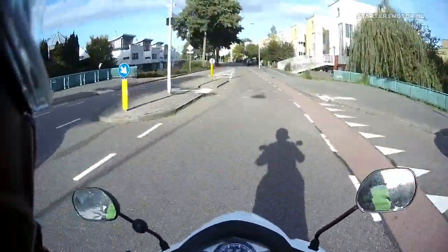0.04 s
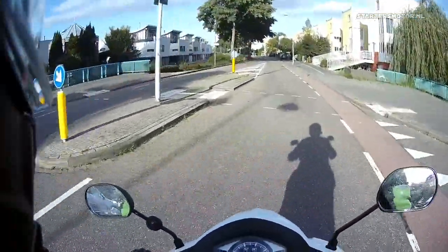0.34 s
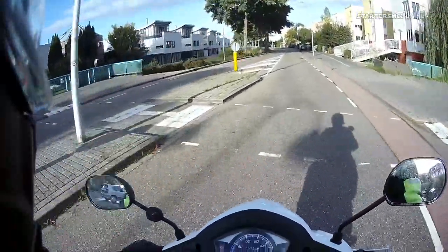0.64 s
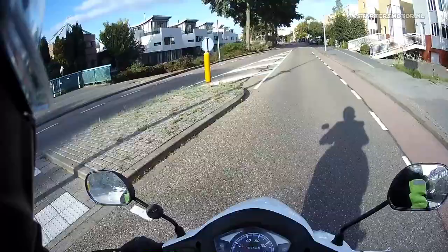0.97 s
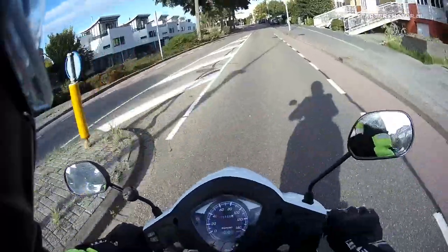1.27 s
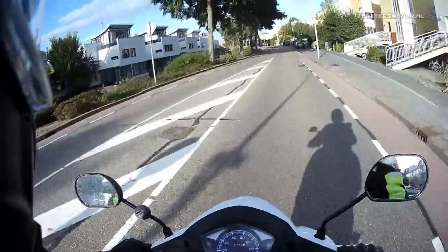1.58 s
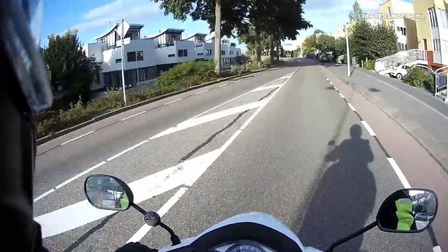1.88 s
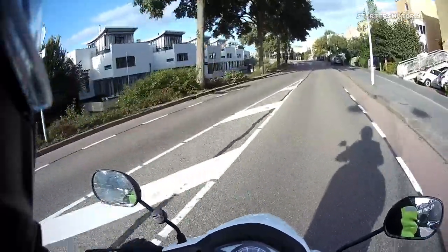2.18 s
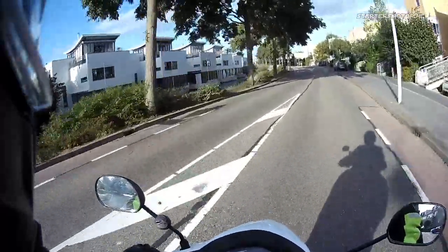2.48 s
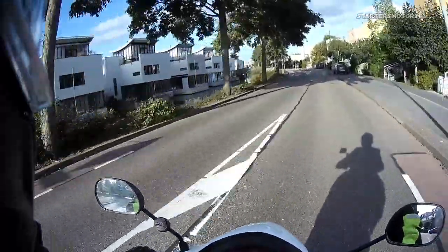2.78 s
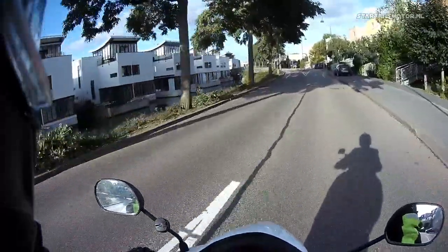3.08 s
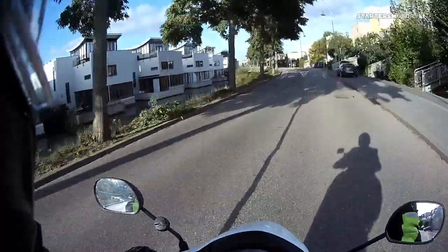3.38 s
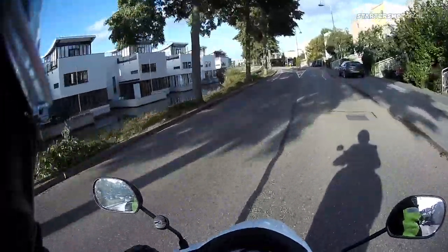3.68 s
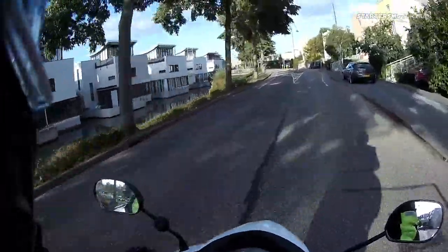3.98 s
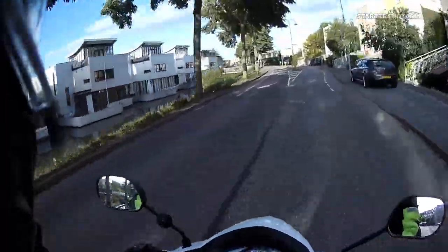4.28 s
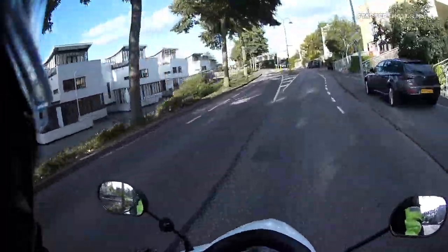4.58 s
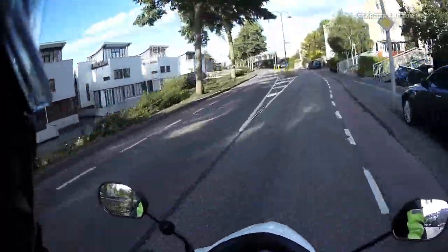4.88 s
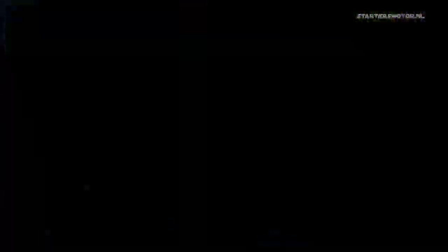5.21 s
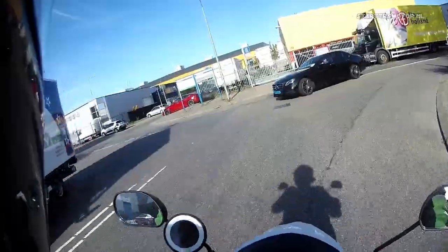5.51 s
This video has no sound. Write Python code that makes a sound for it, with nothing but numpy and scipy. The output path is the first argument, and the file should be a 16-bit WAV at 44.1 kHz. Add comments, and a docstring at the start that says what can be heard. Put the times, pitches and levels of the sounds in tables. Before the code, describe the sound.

A scooter rides through town, heard from the rider's seat. Its single-cylinder engine clatters at nearly steady revs under a horn-like boom that beats against the rising hum of the drive. Wind and tyres rush, gusts buffet the microphone, and a road seam thumps both wheels and clacks the body panels. Near the end the engine fades away and a quieter, windy ride fades in.

```python
"""A horn-like boom over a clattering single-cylinder four-stroke: a scooter in town, microphone at the
rider's seat, revs nearly steady. The engine's seventh and eighth orders boom in a duct resonance, and
the rising hum of the final drive beats against them. Wind and tyres rush, gusts buffet the microphone,
and a road seam thumps both wheels and clacks the body panels; ticks and airy hisses come and go.
Near five seconds the ride fades out and a quieter, windy ride fades in."""
import sys
import numpy as np
from scipy import signal
from scipy.fft import rfft, irfft
from scipy.io import wavfile

SR = 44100
rng = np.random.default_rng(int(sys.argv[2]) if len(sys.argv) > 2 else 0)


def materialize(psi):
    """Save the field psi as 16-bit PCM at rate SR to the path in sys.argv[1].

    A 1-D psi becomes a single channel; in a 2-D psi each row is a channel.
    """
    bounded = np.clip(np.atleast_2d(psi).T, -1, 1)
    quanta = np.round(bounded * 32767).astype(np.int16)
    wavfile.write(sys.argv[1], SR, quanta)


N = 249165
TIME = np.arange(N) / SR

# Engine speed: time_s, firing_hz
FIRING_RATE = [(0.0, 50.08), (0.33, 51.52), (1.22, 51.83), (2.4, 50.54), (2.6, 50.54), (3.34, 48.78),
               (3.85, 50.47), (4.25, 50.93), (4.72, 50.03), (5.15, 47.36)]
# Throttle: time_s, load (0 cruising, 1 pulling)
THROTTLE = [(.2, 0.63), (.3, 0.92), (.62, 1.18), (1.0, 0.93), (1.35, 0.96), (1.85, 0.64), (2.0, .4),
            (2.5, .15), (3.3, 0), (4.1, 0.3), (4.5, 0.22), (4.61, 0.96), (4.67, 0)]
# Engine tones: order (multiple of the firing rate), pulling_db, cruising_db
ENGINE_ORDERS = [(1, -28.5, -28.5), (2, -33, -35), (3, -31.5, -31), (4, -38.5, -34.5), (5, -26, -27.5),
                 (6, -33, -37), (9, -37.5, -39), (10, -34, -40.5), (11, -35, -43), (12, -36.5, -32),
                 (13, -46, -44), (14, -35, -36.5), (15, -43, -43.5), (16, -40, -40.5), (17, -40.5, -50),
                 (19, -35, -43), (20, -39, -44.5), (22, -48.5, -43.5), (23, -46.5, -52), (24, -42, -49),
                 (26, -42.5, -46), (27, -42.5, -41), (28, -48, -44.5), (31, -45, -50.5), (32, -48, -48),
                 (33, -44.5, -51), (34, -49.5, -50.5), (36, -49.5, -51), (45, -61.5, -70), (49, -60.5, -68)]
# Knocks within one engine cycle: cycle_share, strength_db
CYCLE_KNOCKS = [(.955, -1.5), (.11, -11.5), (.2, -9), (.38, -6.5), (.57, -12.5), (.74, -13.5)]
# What each knock rings in the casing: pitch_hz, relative_db, t60_s
CASING_MODES = [(1000, -8.5, 0.035), (1080, -11.5, .02), (1216, -3, 0.022), (1365, 2, 0.045),
                (1500, -3, .015), (1710, -2.5, 0.046), (1838, -3, 0.038), (2540, -18, .025),
                (3400, -18, .008)]
# Gas rush of the firings: frequency_hz, density_db
GAS_SPECTRUM = [(60, -80.5), (200, -57.5), (420, -56.5), (700, -56.5), (1000, -64), (1650, -67.5),
                (2050, -84), (2800, -86.5), (3600, -91), (5000, -99), (12000, -125)]
# Hiss of valve gear and belt: frequency_hz, density_db
BELT_SPECTRUM = [(1500, -93), (2200, -79.5), (2850, -89), (3500, -84), (4300, -95.5), (5300, -96),
                 (5700, -87), (6200, -98), (8000, -105), (8600, -97.5), (9600, -108), (12500, -118)]
# Hum of the final drive, rising with road speed: time_s, pitch_hz
DRIVE_PITCH = [(0, 285), (1.9, 343), (2.6, 358), (3.5, 373), (4.3, 389), (4.7, 394), (5.2, 393)]
# Wind on the microphone and tyre roar from below: frequency_hz, density_db
WIND_SPECTRUM = [(8, -48.5), (22, -42), (45, -53), (100, -56), (250, -57.5), (600, -62), (1000, -68.5),
                 (2000, -81), (4000, -100), (8000, -106), (13000, -116)]
# Gusts on the microphone: middle_s, length_s, gain_db
WIND_GUSTS = [(2.05, 0.27, -1), (3.47, .28, 4), (4.19, .36, 8.5)]
# Small sharp ticks: start_s, level_db, pitch_hz, t60_s
SHARP_TICKS = [(.207, -42, 8000, .0008), (1.174, -24, 8040, .0008), (1.428, -41, 8000, .0008),
               (2.28, -28, 7960, .0008), (2.499, -27, 8000, .0008), (3.447, -27, 8000, .0008),
               (4.489, -37, 8000, .0008), (4.808, -33, 7960, .0008), (5.397, -38, 6500, .002),
               (5.568, -35, 5700, 0.0037), (5.579, -38, 6500, .001)]
# Bursts of airy hiss: middle_s, length_s, gain_db
HISS_BURSTS = [(.86, .3, 0.5), (1.1, .18, -3), (1.91, 0.18, 1), (2.028, 0.13, -2), (2.19, .22, -2.5),
               (5.393, 0.042, -2), (5.51, .09, -3), (5.63, 0.055, -1)]
# Colour of that hiss: frequency_hz, density_db
HISS_SPECTRUM = [(1500, -105), (3500, -87), (6500, -93.5), (9000, -95), (11000, -104), (14000, -111)]
# Wheels over road seams: start_s, gain_db, rattle_t60_s
SEAM_HITS = [(1.957, -5, 0.094), (2.017, -.5, 0.058), (2.032, -7.5, 0.25), (2.073, -3, .1),
             (5.548, -14.5, .04)]
# What a seam rings in the frame: pitch_hz, level_db, t60_s
FRAME_MODES = [(201, -11, 0.041), (587, -16, 0.053), (940, -16.5, 0.029)]
# Chassis rattle: frequency_hz, density_db
CHASSIS_SPECTRUM = [(30, -51), (90, -52), (140, -40), (230, -41), (450, -47), (590, -41), (720, -47),
                    (1100, -55), (2000, -71.5), (5000, -93), (12000, -120)]
# Clacks of loose body panels: start_s, gain_db, t60_s
PANEL_HITS = [(2.014, 1.5, .035), (2.039, -8, .02), (2.071, 1.5, 0.033), (5.622, -17, .04)]
# Colour of a clack: frequency_hz, density_db
PANEL_SPECTRUM = [(400, -72), (800, -54), (1050, -50), (2000, -62), (2600, -67), (3500, -75), (5200, -77.5),
                  (6800, -95), (12000, -112)]
# Windy rush of the quieter ride: frequency_hz, density_db
QUIET_RIDE_SPECTRUM = [(8, -52), (30, -55.5), (90, -60.5), (170, -60.5), (290, -64.5), (400, -63.5),
                       (600, -67.5), (900, -76.5), (1600, -82), (3000, -93), (4500, -98.5), (6000, -99),
                       (12000, -114)]

BOOM_HZ, BOOM_WIDTH_HZ, BOOM_DB = 362.8, 15.2, -14  # narrow duct peak that lifts the seventh order
EIGHTH_DB, EIGHTH_NULL_LOAD = -21, 0.39  # the eighth order cancels at part load
DUCT_HZ, DUCT_WIDTH_HZ, DUCT_NOISE_DB = 367.4, 90, -28.5  # broader band rung by turbulence
HOUSING_HZ, HOUSING_WIDTH_HZ, DRIVE_DB = 371.5, 68, -26.5  # resonance of the drive housing
CUT_S = 5.2  # one ride gives way to the other


def gain_of(db):
    """Decibels to amplitude."""
    return 10 ** (np.asarray(db) / 20)


def unit_rms(x):
    """Scales to rms 1."""
    return x / np.sqrt(np.mean(x ** 2) + 1e-20)


def curve(rows):
    """A (time_s, value) table interpolated at every sample."""
    return np.interp(TIME, *np.transpose(rows))


def wander(rate_hz):
    """Smooth random drift of rms 1, mostly slower than rate_hz."""
    hz = np.fft.rfftfreq(N, 1 / SR)
    return unit_rms(irfft(rfft(rng.standard_normal(N)) * np.exp(-(hz / rate_hz) ** 2) * (hz > 0), N))


def rush(spectrum, envelope, size=8192):
    """Noise under an envelope, then through a causal filter shaped to a density in dB per hertz."""
    hz, db = np.transpose(spectrum)
    bin_hz = abs(np.fft.fftfreq(size, 1 / SR)) + 1
    log_gain = np.log(gain_of(np.interp(np.log(bin_hz), np.log(hz), db)))
    taps = np.fft.ifft(np.exp(np.conj(signal.hilbert(log_gain)))).real[:size // 2]  # minimum phase
    return signal.oaconvolve(rng.standard_normal(N) * envelope, taps)[:N] * np.sqrt(SR / 2)


def stroke(cycles, at, decay):
    """One dying burst a cycle, rms 1; at and decay are shares of the cycle."""
    return unit_rms(np.exp(-((cycles - at) % 1) / decay))


def resonance(hz, centre_hz, width_hz):
    """Gain of a tone passing through a resonance, 1 at its centre."""
    return 1 / np.hypot(1, 2 * (hz - centre_hz) / width_hz)


def ringing(modes, length_s):
    """A dying sine for each (pitch_hz, level_db, t60_s), summed."""
    t = TIME[:round(length_s * SR)]
    return sum(gain_of(db - 60 * t / t60) * np.sin(2 * np.pi * hz * t) for hz, db, t60 in modes)


def swells(events):
    """An envelope with a smooth arch for each (middle_s, length_s, gain_db)."""
    return sum(gain_of(db) * np.cos(np.pi * np.clip((TIME - middle) / length, -.5, .5))
               for middle, length, db in events)


def jolts(events):
    """An envelope that jumps and dies away for each (start_s, gain_db, t60_s)."""
    return sum(gain_of(db - 60 * abs(TIME - start) / t60) * (TIME >= start) for start, db, t60 in events)


def duct_boom(cycles, load, lag_cycles=0.169, load_db=4.5):
    """Two orders sound in the duct and swell together after each firing; turbulence rings it too."""
    angle = 2 * np.pi * (cycles - lag_cycles)
    seventh = gain_of(BOOM_DB + load_db * (load - 1) + 0.6 * wander(2.7))
    seventh *= resonance(7 * curve(FIRING_RATE), BOOM_HZ, BOOM_WIDTH_HZ)
    eighth = gain_of(EIGHTH_DB) * abs(load - EIGHTH_NULL_LOAD) / (1 - EIGHTH_NULL_LOAD)
    tones = seventh * np.cos(7 * angle) + eighth * np.cos(8 * angle)
    turbulence = rng.standard_normal(N) * stroke(cycles, at=0, decay=0.9)
    b, a = signal.iirpeak(DUCT_HZ, DUCT_HZ / DUCT_WIDTH_HZ, SR)
    ring = signal.lfilter(b, a, signal.lfilter(b, a, turbulence))
    return np.sqrt(2) * tones * (1 + 0.05 * wander(25)) + gain_of(DUCT_NOISE_DB) * unit_rms(ring)


def engine_tones(cycles, load, waver=0.16, waver_hz=9, trim_db=0.27, uneven_db=1.12):
    """Clean orders, each wavering a little; the upper ones line up into the knocks of each cycle."""
    out = np.zeros(N)
    firing_strength = gain_of(uneven_db * wander(30))
    for order, pulling_db, cruising_db in ENGINE_ORDERS:
        level = gain_of(trim_db + cruising_db + load * (pulling_db - cruising_db))
        if order > 16:
            knocks = sum(gain_of(db) * np.exp(-2j * np.pi * order * share) for share, db in CYCLE_KNOCKS)
            phase = np.angle(knocks)
            level *= firing_strength
        else:
            phase = 2 * np.pi * rng.random()
        tone = np.exp(1j * (2 * np.pi * order * cycles + phase))
        tone *= 1 + waver * (wander(waver_hz) + 1j * wander(waver_hz))  # in level and phase
        out += level * tone.imag
    return np.sqrt(2) * out


def head_clatter(cycles, load, level_db=-40, load_db=2, uneven_db=2, jitter_cycles=.005):
    """Combustion and valve knocks ring the casing, each a little different in strength and timing."""
    blows = np.zeros(N)
    for share, db in CYCLE_KNOCKS:
        knock_count = np.floor(cycles - share + jitter_cycles * wander(30))
        at = np.flatnonzero(np.diff(knock_count) > 0)
        blows[at] += gain_of(db + uneven_db * wander(40)[at])
    # on the way to the seat, the body panels pass the middle and muffle the treble
    panels = signal.butter(4, [850, 1900], "band", fs=SR, output="sos")
    ring = signal.sosfilt(panels, ringing(CASING_MODES, length_s=0.1))
    return gain_of(level_db + load_db * load) * unit_rms(signal.oaconvolve(blows, ring)[:N])


def gas_rush(cycles, load, load_db=1):
    """Gas rushes in a puff after each firing."""
    puffs = unit_rms(1.3 + stroke(cycles, at=0, decay=.4))
    return rush(GAS_SPECTRUM, puffs * gain_of(load_db * load + 0.73 * wander(25)))


def valve_and_belt_hiss(cycles, load, load_db=4):
    """Valve gear and belt hiss later in the cycle, louder under load."""
    pulses = unit_rms(1.1 + stroke(cycles, at=.36, decay=0.3))
    return rush(BELT_SPECTRUM, pulses * gain_of(load_db * (load - 1) + .9 * wander(20)))


def final_drive(waver_db=0.9):
    """The drive hums with the wheel and swells as it climbs through the resonance of its housing."""
    hz = curve(DRIVE_PITCH)
    tone = np.sin(2 * np.pi * np.cumsum(hz) / SR) * resonance(hz, HOUSING_HZ, HOUSING_WIDTH_HZ) ** 2
    return np.sqrt(2) * tone * gain_of(DRIVE_DB + waver_db * wander(13))


def wind_and_tyres(db_per_doubling=7, lumps_db=2, gust_top_hz=170):
    """The roar grows with road speed; gusts buffet the microphone in the bass."""
    speed = curve(DRIVE_PITCH) / curve(DRIVE_PITCH).max()
    roar = rush(WIND_SPECTRUM, gain_of(db_per_doubling * np.log2(speed) + lumps_db * wander(30)))
    gusts = rush(WIND_SPECTRUM, swells(WIND_GUSTS))
    return roar + signal.sosfilt(signal.butter(2, gust_top_hz, fs=SR, output="sos"), gusts)


def ticks():
    """Tiny hard clicks, each a high ring gone within milliseconds."""
    out = np.zeros(N)
    for start_s, db, hz, t60 in SHARP_TICKS:
        tick = ringing([(hz, db, t60)], length_s=0.01)
        out[round(start_s * SR):][:len(tick)] += tick
    return out


def airy_hisses(flutter_db=2.5, grain_db=3.5, trim_db=-3):
    """Short swells of fluttering, gritty hiss."""
    texture = gain_of(trim_db + flutter_db * wander(120) + grain_db * wander(1500))
    return rush(HISS_SPECTRUM, swells(HISS_BURSTS) * texture)


def road_seams():
    """Each wheel striking a seam rings the frame and rattles the chassis below the seat."""
    blows = np.zeros(N)
    for start_s, db, _ in SEAM_HITS:
        blows[round(start_s * SR)] = gain_of(db)
    ring = ringing(FRAME_MODES, length_s=0.125)
    ring *= 1 - np.exp(-TIME[:len(ring)] / 0.0005)  # the tyre softens the blow
    return signal.oaconvolve(blows, ring)[:N] + rush(CHASSIS_SPECTRUM, jolts(SEAM_HITS))


def panel_clacks():
    """Jolted body panels clack close to the microphone and quickly settle."""
    return rush(PANEL_SPECTRUM, jolts(PANEL_HITS))


def fade_out(start_s=4.925, length_s=0.36, shut_s=0.018):
    """The fader falls on a square law, then shuts quickly."""
    fall = np.clip(1 - (TIME - start_s) / length_s, 0, 1) ** 2
    return fall * np.clip((CUT_S - TIME) / shut_s + .5, 0, 1)


def quiet_ride(flicker_db=1.4, fade_in_s=0.19):
    """Softer wind on the microphone; the fader opens on it, slowly at first."""
    fade_in = np.clip((TIME - CUT_S) / fade_in_s, 0, 1) ** 1.36
    return rush(QUIET_RIDE_SPECTRUM, gain_of(flicker_db * wander(40))) * fade_in


def scene(first_ride_db=-0.37):
    """Mono, from the seat: one crank drives all engine layers; the first ride fades, a second follows."""
    cycles = np.cumsum(curve(FIRING_RATE) * (1 + .0006 * wander(12))) / SR  # one cycle per firing
    load = curve(THROTTLE)
    engine = engine_tones(cycles, load) + duct_boom(cycles, load) + head_clatter(cycles, load)
    engine += gas_rush(cycles, load) + valve_and_belt_hiss(cycles, load)
    first_ride = (engine + final_drive() + wind_and_tyres()) * gain_of(first_ride_db) * fade_out()
    return (first_ride + quiet_ride() + road_seams() + panel_clacks() + airy_hisses() + ticks())[None]


def record(dry, low_cut_hz=6, top_hz=13200):
    """The recorder blocks the deepest rumble, opens over 3 ms and limits the band."""
    low_cut = signal.butter(1, low_cut_hz, "high", fs=SR, output="sos")
    opened = signal.sosfilt(low_cut, dry) * np.minimum(TIME / .003, 1)
    high_cut = signal.firwin(255, top_hz, window=("kaiser", 8), fs=SR)
    return signal.oaconvolve(opened, high_cut[None], "same")


dry = scene()
out = record(dry)
materialize(out)
```